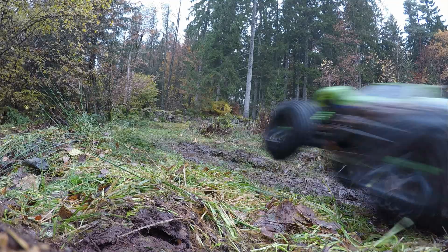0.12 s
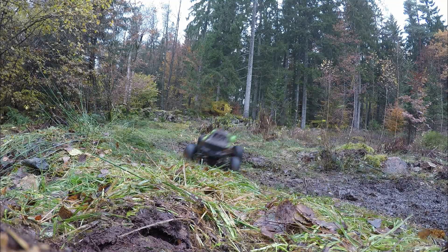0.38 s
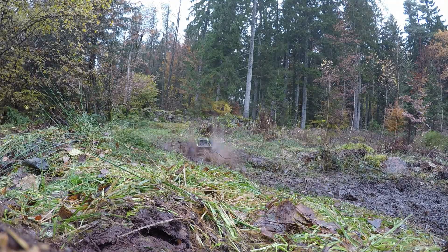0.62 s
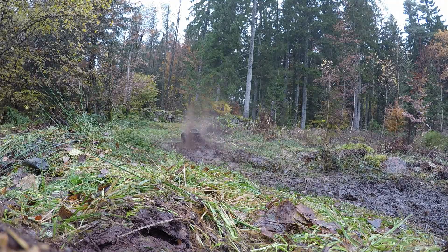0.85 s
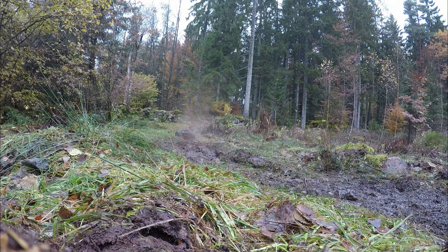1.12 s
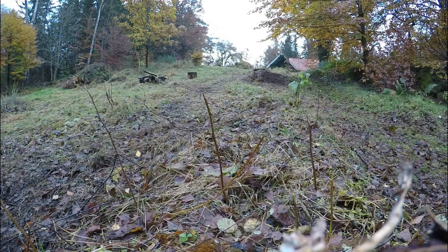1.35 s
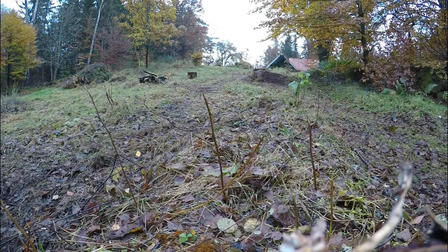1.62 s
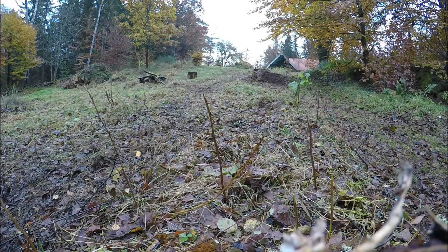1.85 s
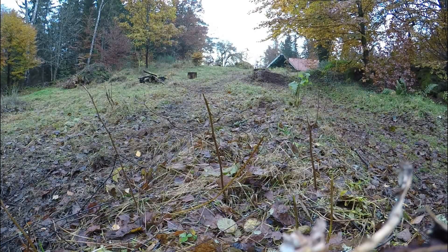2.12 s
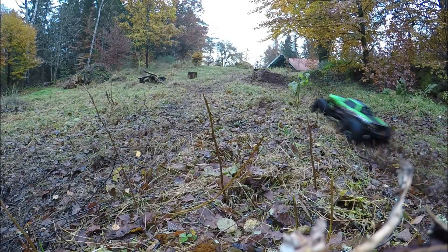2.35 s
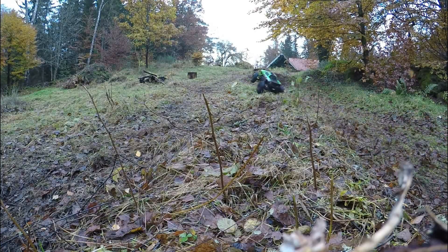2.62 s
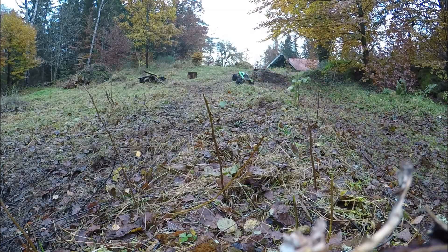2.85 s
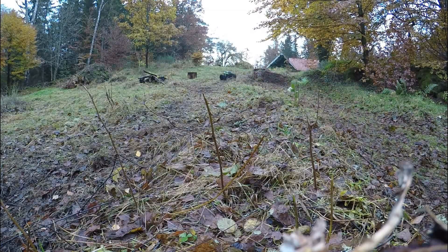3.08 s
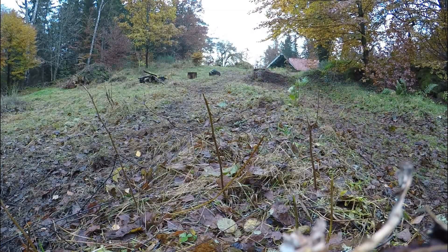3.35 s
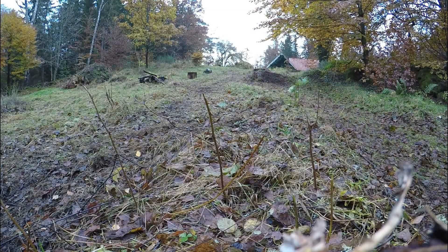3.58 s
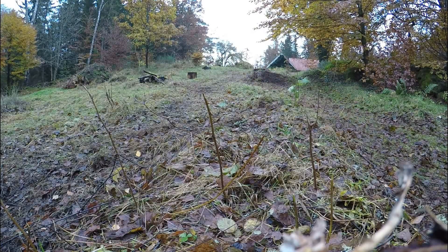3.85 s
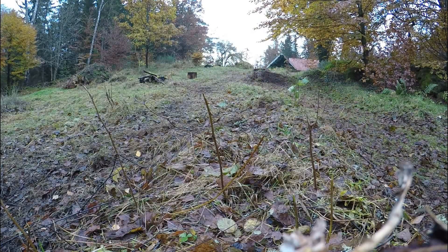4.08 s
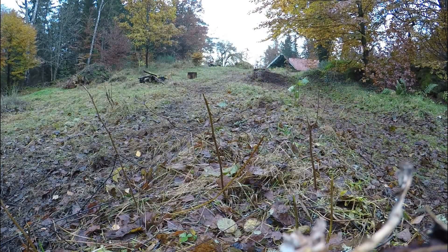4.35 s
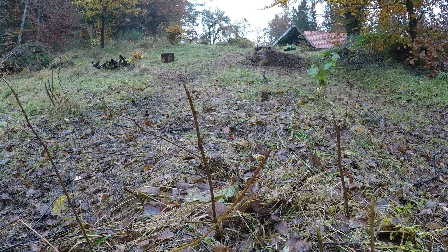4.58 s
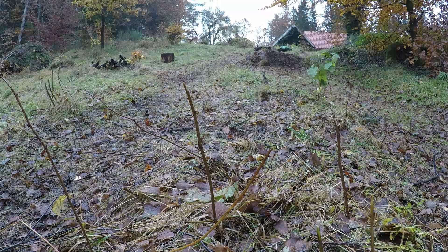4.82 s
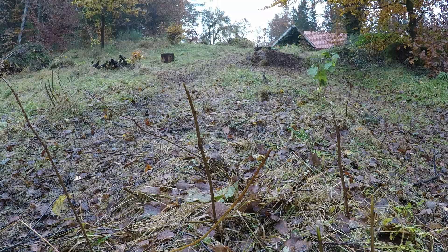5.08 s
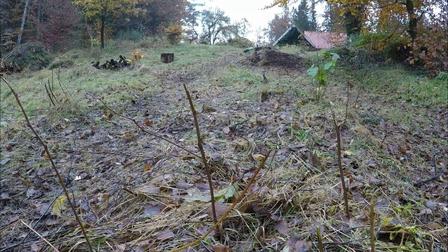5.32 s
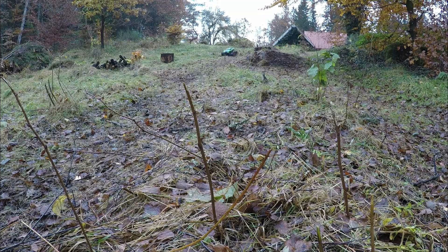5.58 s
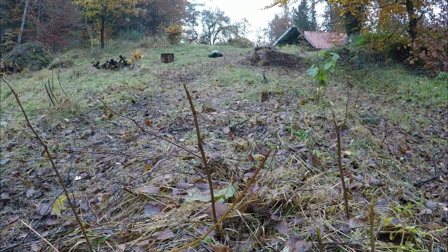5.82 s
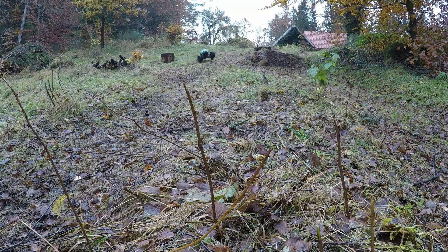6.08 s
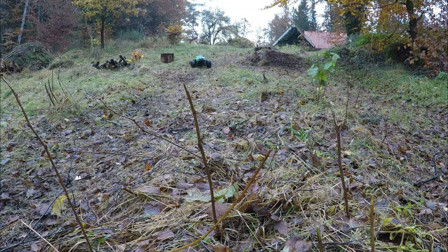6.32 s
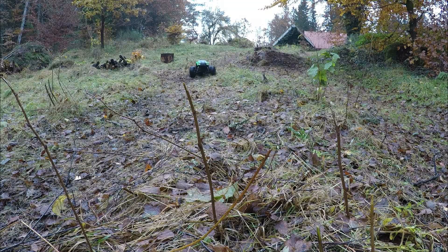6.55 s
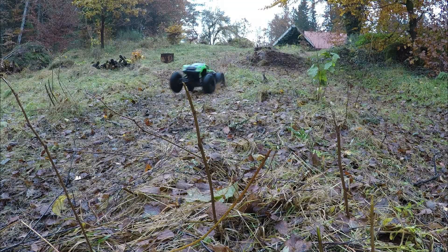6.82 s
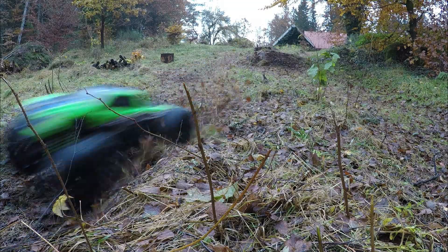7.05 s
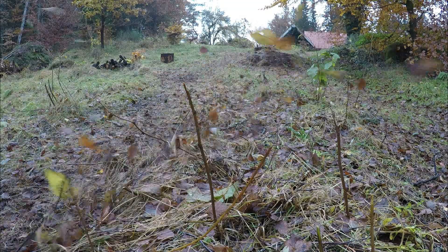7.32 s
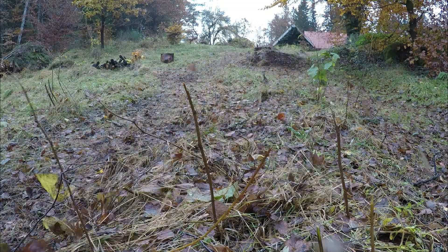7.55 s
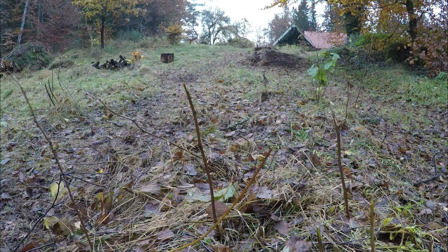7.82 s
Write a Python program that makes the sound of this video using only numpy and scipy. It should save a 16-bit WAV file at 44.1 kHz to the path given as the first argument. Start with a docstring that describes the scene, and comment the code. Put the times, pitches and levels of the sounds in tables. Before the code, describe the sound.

A fast electric model truck whines and tears past over wet leafy ground in four abruptly cut passages, gears screaming, tyres rumbling, mud spraying.

```python
"""A fast electric model truck whines and tears past over wet, leafy ground, in four passages end to end.
Gear and shaft lines are sines that follow the throttle, the mesh roughened by random modulation.
Tyre rumble, thrown mud, gearbox whirr and gear hiss are shaped noises; thuds and ticks are damped sines.
A two-port microphone on a camera colours the truck by its bearing; dirt lands nearby, light wind puffs
on the microphone and a faint hush surrounds it all."""
import sys
import numpy as np
from scipy import signal
from scipy.fft import rfft, irfft
from scipy.io import wavfile
from scipy.ndimage import uniform_filter1d

SR = 44100
rng = np.random.default_rng(int(sys.argv[2]) if len(sys.argv) > 2 else 0)


def decibels_to_gain(level_db):
    """Convert a level in decibels to a linear amplitude gain (20 dB per decade)."""
    exponent = np.asarray(level_db, float) / 20
    return 10 ** exponent


def materialize(psi):
    """Save the field psi as 16-bit PCM at rate SR to the path in sys.argv[1].

    A 1-D psi becomes a single channel; in a 2-D psi each row is a channel.
    """
    bounded = np.clip(np.atleast_2d(psi).T, -1, 1)
    quanta = np.round(bounded * 32767).astype(np.int16)
    wavfile.write(sys.argv[1], SR, quanta)


N = 349713

# Noise of the moving truck, one table a passage.
# Each row: time in seconds, gear hiss level in dB, tyre rumble level in dB.
DRIVE = [
    [(0, -25, -17.5), (.05, -21, -14), (.22, -19.5, -33.5), (.41, -26.5, -28.5), (.43, -24, -21),
     (.6, -18.5, -13), (.84, -27.5, -23), (1.11, -27, -20.5), (1.3, -36, -27.5), (1.35, -32.5, -30)],
    [(1.355, -41, -41), (1.5, -37, -42), (2.07, -23.5, -20.5), (2.43, -24.5, -19), (2.56, -30, -34.5),
     (2.73, -33.5, -27.5), (3.08, -35.5, -28.5), (3.16, -30.5, -35), (3.3, -40, -37), (3.39, -40, -40.5),
     (3.42, -46, -42), (3.58, -49, -35.5), (3.72, -46.5, -49.5), (4.21, -57, -49), (4.3, -60.5, -59),
     (4.7, -60, -56)],
    [(4.7, -57.5, -58), (5.0, -50, -48), (5.19, -56, -49), (5.35, -50.5, -48.5), (5.74, -50, -49.5),
     (6.02, -37.5, -38), (6.11, -41.5, -42.5), (6.36, -36, -35.5), (7.07, -23.5, -19.5), (7.23, -30, -22.5),
     (7.25, -41.5, -21), (7.4, -46.5, -45), (7.76, -53, -53.5)],
    [(7.77, -40.5, -28.5), (7.8, -41, -26), (7.815, -40, -34), (7.93, -47.5, -44)],
]
# Bearing cue of the truck. Each row: time in seconds, left over right in dB.
SIDE_DB = [(0, -4.5), (.22, -2), (.42, 4.5), (.84, 2), (1.34, 3.5), (1.36, -1), (2.07, -5.5), (2.43, -2),
           (2.6, 1.5), (3.05, 2.5), (4.7, 3), (5.0, 2.5), (6.0, 9.5), (7.07, 8.5), (7.24, 18), (7.4, 16),
           (7.75, -1.5), (7.78, 11), (7.93, 9)]


def evened(x):
    """Normalises mean power: scales to rms 1."""
    return x / np.sqrt(np.mean(np.abs(x) ** 2) + 1e-20)


def read(points, hz):
    """Interpolates a spectrum on a logarithmic frequency axis."""
    f, value = np.transpose(points)
    return np.interp(np.log(hz + 1), np.log(f + 1), value)


def columns(*tables):
    """Joins consecutive tables into envelopes: each column interpolated at every sample."""
    s, *values = np.concatenate(tables).T
    return [np.interp(np.arange(N) / SR, s, v) for v in values]


def add(mix, s, sound):
    """Superposes a sound on the mix, starting at s seconds."""
    part = mix[..., round(s * SR):][..., :sound.shape[-1]]
    part += sound[..., :part.shape[-1]]


def slow(hz, size):
    """Low-passed Gaussian noise: a random wander of rms 1, mostly below hz."""
    spectrum = rfft(rng.standard_normal(size))
    spectrum /= 1 + (np.fft.rfftfreq(size, 1 / SR) / hz) ** 4
    return evened(irfft(spectrum, size))


def noise(colour, patchy_db, jolt_db, jolt_hz, size=1024):
    """Random-phase synthesis: two unrelated noises sharing colour, drifting patches and wide-band jolts."""
    hz = np.fft.rfftfreq(size, 1 / SR)
    frames = 4 * N // size + 5
    *parts, patches = rng.standard_normal((frames, len(hz), 5)).T
    patches = uniform_filter1d(patches, size=9, axis=0)
    patches = evened(uniform_filter1d(patches, size=9, axis=1))
    spectra = np.array(parts[:2]) + 1j * np.array(parts[2:])
    spectra = spectra * decibels_to_gain(read(colour, hz)[:, None] + patchy_db * patches)
    pair = signal.istft(spectra, nperseg=size, noverlap=3 * size // 4)[1][:, :N]
    return evened(pair * decibels_to_gain(jolt_db * slow(jolt_hz, N)))


def ring(hz, t60, rise_s):
    """Damped oscillator: a sine of peak about 1 with a soft onset, falling 60 dB in t60 seconds."""
    t = np.arange(round(t60 * SR)) / SR
    shape = (1 - np.exp(-t / rise_s)) * decibels_to_gain(-60 * t / t60)
    return shape / shape.max() * np.sin(2 * np.pi * hz * t)


def motor(rows, overtone_db, breakup_db, hiss_db):
    """Order-locked tones: shaft and mesh lines keep fixed ratios, and the mesh throbs once a wheel turn."""
    # Shaft lines swell and fade about their speed rule. Each row: time in seconds, change in dB.
    free = [(.2, 1.5), (.28, 8), (.41, 8.5), (.46, 0.5), (1.8, 13.5), (2.0, -2), (2.5, -4), (2.6, 7),
            (3.36, 3), (3.45, 10), (3.53, 19), (3.62, 17), (4.5, -59), (4.9, 19.5), (5.6, 12.5), (5.9, 6.5),
            (6.8, 2.5), (6.9, 8.5), (7.12, 6.5), (7.2, -4)]
    # Lines above the shaft's own. Each row: multiple of shaft speed, level in dB.
    shaft_orders = [(1.43, -8.5), (1.89, 4)]
    # Gear-mesh lines. Each row: multiple of mesh frequency, level in dB.
    mesh_orders = [(1, 0), (2.05, -7), (2.72, -1)]
    # The gear case lets upper mesh orders out. Each row: frequency in Hz, gain in dB.
    case = [(3700, -25), (4200, -8), (5800, 0), (7700, 0), (8500, -25)]
    # Upper mesh orders against the first. Each row: time in seconds, extra level in dB.
    upper = [(.05, 5), (1.45, -1), (1.76, 6), (1.83, -5), (2.21, 13), (2.3, 2), (6.15, -5), (6.4, -6),
             (6.5, 3), (6.6, 7), (6.64, -5), (7.2, -12)]
    # Slower gears behind the first mesh. Each row: multiple of mesh frequency, level in dB.
    axle_orders = [(.655, 2), (.44, 2.5)]
    # The axle gears sing now and then. Each row: time in seconds, level over the gear hiss in dB.
    axle = [(.08, -30), (.15, -6), (.3, -5), (.36, -30), (2.45, -30), (2.55, -7), (3.03, -16), (3.07, -3),
            (3.11, -30), (7.3, -30), (7.36, -10), (7.45, -3), (7.47, -30)]
    mesh_per_turn, wheel_gearing = 6.48, 11  # mesh cycles per shaft turn, shaft turns per wheel turn
    full_speed_hz = 4180  # mesh frequency at which the shaft rule gives its base level

    s, *values = np.transpose(rows)
    t = np.arange(s[0], s[-1], 1 / SR)
    size = len(t)
    hz, mesh_db = (np.interp(t, s, v) for v in values)
    level_db = hiss_db[round(s[0] * SR):][:size]
    turn = 2 * np.pi * np.cumsum(hz * (1 + 0.008 * slow(30.8, size))) / SR / mesh_per_turn

    # The shaft grows 12.5 dB per octave of speed; its upper orders take the swell twice.
    free_db = np.interp(t, *np.transpose(free))
    shaft_db = level_db + free_db - 6.5 + 12.5 * np.log2(hz / full_speed_hz)
    shaft = [(0.99, 0.0037)] + [(k, db + overtone_db + free_db) for k, db in shaft_orders]
    out = np.zeros(size)
    for k, db in shaft:
        flutter_db = 3.0 * slow(25.0, size)
        out += decibels_to_gain(shaft_db + db + flutter_db) * np.sin(k * turn)

    rough = np.interp(hz, [1500, 2600, 3800], [.25, .55, .8])  # random share of mesh power
    rough = np.maximum(rough, breakup_db / 5)  # a stuttering mesh is also rough
    throb = 1 + .45 * np.cos(turn / wheel_gearing + .8 * slow(8., size))
    throb *= decibels_to_gain(breakup_db * slow(25., size))
    for k, db in mesh_orders:
        uneven = (slow(k * 80., size) + 1j * slow(k * 80., size)) / np.sqrt(2)
        teeth = np.sqrt(1 - rough) + np.sqrt(rough) * uneven
        case_db = read(case, k * hz) + np.interp(t, *np.transpose(upper)) if k > 1 else 0
        line = (teeth * np.exp(1j * k * mesh_per_turn * turn)).real
        out += decibels_to_gain(level_db + mesh_db + db + case_db) * throb * line

    axle_db = level_db + np.interp(t, *np.transpose(axle))
    for k, db in axle_orders:
        out += decibels_to_gain(axle_db + db) * slow(140., size) * np.sin(k * mesh_per_turn * turn)
    return s[0], np.sqrt(2) * out * signal.windows.tukey(size, .02)


def chatter(s, db, hz):
    """Repeated impulse response: three uneven ringing ticks."""
    out = np.zeros(round(.05 * SR))
    for k, (late, tune, size) in enumerate(rng.uniform(-1, 1, (3, 3))):
        tick = decibels_to_gain(db + 2.5 * size) * ring(hz * (1 + 0.042 * tune), 0.015, 0.00028)
        add(out, 0.0035 * k * (1 + 0.3 * late), tick)  # ticks about 3.5 ms apart
    return s, out


def tyres(rumble_db):
    """Broadband contact noise: low tyre rumble under the brighter spray of thrown mud."""
    # Spectra of tyre rumble and mud spray. Each row: frequency in Hz, relative density in dB per Hz.
    rumble = [(110, -0.5), (220, 3.5), (400, 1), (600, -7.5), (900, -21), (1500, -57)]
    spray = [(350, -6), (650, 8), (1000, 7), (1400, -1.5), (2200, -9.5), (2900, -29), (5000, -56)]
    # How much mud the tyres throw. Each row: time in seconds, spray over rumble in dB.
    mud = [(0, 3.5), (.05, -5.5), (.22, 11), (.41, 6), (.43, 1), (1.11, -4.5), (1.3, -9), (1.36, -2.5),
           (2.56, -3.5), (2.9, -20), (3.3, -13), (4.0, -27), (4.7, -6.5), (6.0, -18), (6.36, -15),
           (7.0, -6), (7.4, 1), (7.75, -2), (7.78, -14.5), (7.93, 3.5)]
    spray_db = rumble_db + columns(mud)[0]
    pair = decibels_to_gain(rumble_db) * noise(rumble, patchy_db=1.7, jolt_db=1.82, jolt_hz=19.0)
    return pair + decibels_to_gain(spray_db) * noise(spray, patchy_db=3.56, jolt_db=1.0, jolt_hz=31.0)


def shell_ring():
    """Modal resonance: noise rings narrow shell modes, each swelling on its own."""
    # Modes of the gearbox shell. Each row: frequency in Hz, width in Hz, level in dB.
    shell_modes = [(1716, 120, -1), (2400, 92, -1), (3130, 70, 1), (3860, 40, 2), (5560, 40, 4),
                   (5930, 63, 0)]
    drive = rng.standard_normal((2, N))
    out = np.zeros((2, N))
    for hz, width, db in shell_modes:
        mode = evened(signal.lfilter(*signal.iirpeak(hz, hz / width, SR), drive))
        out += decibels_to_gain(db + 3 * slow(6., N)) * mode
    return evened(out)


def gearbox(hiss_db):
    """Directional radiation: shell whirr crossfades with bearing, over resonant ringing and gear hiss."""
    # Shell spectra heard end-on, then side-on. Each row: frequency in Hz, relative density in dB per Hz.
    whirr = [
        [(850, -19), (1450, -10), (1620, -3.5), (1780, 0), (2290, -2), (3120, 0.5), (3460, 2), (3880, 1),
         (4400, -10.5), (5720, -8.5), (9680, -120)],
        [(900, -16.5), (1500, -8.5), (2100, -9.5), (2700, -12), (3600, -10.5), (5000, -51), (9000, -92)],
    ]
    # Gear hiss spectrum. Each row: frequency in Hz, relative density in dB per Hz.
    hiss = [(2530, -49), (4300, -8.5), (5070, -7.5), (5700, -3.5), (6720, -4.5), (7330, -7.5),
            (8170, -13.5), (9930, -18), (12000, -39.5), (13700, -36), (14700, -67)]
    # Each row: time in seconds, gearbox whirr over gear hiss in dB.
    shell = [(0, -9.5), (.22, 1.5), (.6, -6.5), (.84, -3.5), (1.11, -8), (1.4, -3.5), (2.4, -4.5),
             (2.56, 1.5), (3.16, -3), (3.3, 10), (3.39, 4), (3.72, -3), (4.2, 7), (4.7, -2), (6.0, -3.5),
             (6.11, 5), (6.36, -6.5), (7.07, 1), (7.25, 1), (7.4, -1), (7.75, -5), (7.93, 5)]
    # Each row: time in seconds, shell resonances over the whirr in dB.
    ringing = [(1.9, -10), (2.2, -18), (2.8, -9.5), (5.9, -9.5), (6.45, 3), (6.9, -8)]
    whirr_db = hiss_db + columns(shell)[0]
    side_on = bearing(columns(SIDE_DB)[0])
    pair = decibels_to_gain(whirr_db + columns(ringing)[0]) * shell_ring()
    for colour, share in zip(whirr, (1 - side_on, side_on)):
        pair += decibels_to_gain(whirr_db) * np.sqrt(share) * noise(colour, patchy_db=2.0, jolt_db=0.64, jolt_hz=47.0)
    return pair + decibels_to_gain(hiss_db) * noise(hiss, patchy_db=1.87, jolt_db=0.99, jolt_hz=5.3, size=512)


def thuds():
    """Impact response: the chassis lands on bumps and clods thump down close by, as damped sines."""
    # Chassis landing on bumps. Each row: start in seconds, peak level in dB, frequency in Hz.
    bumps = [(0.012, -8, 215), (0.125, -16.5, 228), (0.443, -9.5, 262), (0.691, -10, 376),
             (1.105, -28, 290), (2.325, -13, 245.3), (2.397, -14.5, 283), (2.709, -20.5, 341),
             (3.095, -21, 305), (6.767, -21, 428), (7.155, -12.5, 199.5), (7.2, -8.5, 186)]
    # Clods thumping down. Each row: start in seconds, peak level in dB, frequency in Hz.
    clods = [(7.345, -15.5, 218), (7.564, -23.5, 174), (7.769, -21, 229), (7.786, -25, 326),
             (7.827, -18.5, 240)]
    out = np.zeros(N)
    for hits, t60_s in (bumps, 0.1), (clods, 0.013):
        for s, db, hz in hits:
            add(out, s, decibels_to_gain(db) * ring(hz, t60_s, rise_s=0.0058))
    return out


def truck():
    """Superposition: direct sound, and an unrelated twin of its noise that stands for scattered sound."""
    # Throttle runs, one table each.
    # Each row: time in seconds, gear mesh frequency in Hz, mesh line over the gear hiss in dB.
    runs = [
        [(0, 2150, 4), (.08, 2413, -11), (.13, 2881, -6), (.19, 3046, -17), (.33, 3230, -9), (.37, 3196, -2.5),
         (.45, 3092, -39), (.98, 2960, -6.5)],
        [(1.352, 1485, 5.5), (1.54, 1748, -2.5), (1.6, 1878, -34), (1.66, 1900, -2.5), (1.88, 3000, -3.5),
         (1.93, 3157, -11), (2.0, 3680, -6), (2.05, 3735, -7), (2.14, 3400, -14), (2.29, 3950, -15),
         (2.385, 3620, -9), (2.45, 3106, -15), (2.53, 3690, -18), (2.64, 4130, -6), (2.75, 3765, -9),
         (2.8, 3930, -21), (2.85, 3625, -4), (3.0, 3928, -16), (3.07, 3565, 0.5), (3.13, 3090, -7),
         (3.2, 3776, -5.5), (3.34, 4024, 2), (3.47, 3495, -30), (3.53, 2835, -30), (3.62, 2150, -25)],
        [(3.8, 3360, -7), (4.05, 3290, -9), (4.3, 3340, 0), (4.5, 3570, -18), (4.6, 3440, 0), (4.8, 3260, -6)],
        [(4.82, 1500, -5), (4.91, 1530, 0), (5.02, 1740, -3), (5.15, 1520, -4), (5.29, 1590, -2),
         (5.4, 1770, -4), (5.53, 1706, -5), (5.68, 1848, -11), (5.78, 1624, -0.5), (5.94, 1987, 0.5),
         (5.99, 2140, -7), (6.03, 2474, -3), (6.15, 3006, 3), (6.28, 2930, -8), (6.325, 2450, -4),
         (6.37, 2500, -22), (6.44, 2700, -5), (6.605, 2960, -3), (6.63, 3380, 6.5), (6.67, 3740, -2),
         (6.72, 3555, -3), (6.9, 4115, -10), (7.06, 3920, -3), (7.1, 3543, -4), (7.13, 3270, -28)],
        [(7.17, 2300, -15), (7.195, 2400, 2), (7.225, 2150, 2), (7.26, 2020, 5), (7.31, 1550, 1),
         (7.35, 1900, -11), (7.4, 2130, -7), (7.45, 2620, -4), (7.47, 2700, -20)],
        [(7.45, 967, -10), (7.5, 1106, -6), (7.535, 1250, -6), (7.6, 1540, -16)],
    ]
    # One value a run: strength of the upper shaft orders in dB.
    overtones_db = [-8, -41.5, -12, -33, -19, -17]
    # One value a run: how much the mesh stutters in dB.
    breakups_db = [3.5, 1.5, 2.5, 1.8, 2.2, 3]
    # A gear chatters under load; the last row is a dry tick of flung dirt. Each row: start in seconds, nominal
    # peak in dB, nominal frequency in Hz.
    chatters = [(4.07, -36, 3100), (4.165, -42, 3300), (4.198, -38.5, 3500), (5.9255, -27, 5830),
                (5.968, -19, 5830), (5.984, -23, 5830), (5.998, -25, 5830), (6.008, -20.5, 5830),
                (7.157, -14, 6000)]
    hiss_db, rumble_db = columns(*DRIVE)
    pair = tyres(rumble_db) + gearbox(hiss_db)
    direct = pair[0]
    for rows, overtone_db, breakup_db in zip(runs, overtones_db, breakups_db):
        add(direct, *motor(rows, overtone_db, breakup_db, hiss_db))
    direct += thuds()
    for row in chatters:
        add(direct, *chatter(*row))
    return pair


def bearing(pan_db):
    """Level-difference localisation: 0 ahead (2.5 dB to the left), 1 far right (4 dB to the right)."""
    ahead_db, right_db = 2.5, -4.0
    return np.clip((pan_db - ahead_db) / (right_db - ahead_db), 0, 1)


def ports(pair):
    """Diffraction: the camera body gives each port its own level and phase, by the truck's bearing."""
    # The two microphone ports. Each row: frequency in Hz, left over right in dB and left lead in radians
    # for a source ahead, the same two for one far right, likeness of the ports from 0 to 1.
    responses = [(167, 0.5, 0.6, 2, 1.3, 1), (305, 7, -0.15, 5.5, -1.5, 1), (454, 4, 1.4, 11.5, 0.2, 0.71),
                 (595, 12, -2.5, 8, -1.5, 0.95), (765, 2, -1.65, -4.5, -2, 1),
                 (1200, -4.5, -1, -11, -3, 0.92), (1770, 1, 1.15, -14.5, -2.5, 0.83),
                 (3000, -1.5, -0.37, -10.5, -1.5, 1), (5130, 3.5, 0.74, 0.5, -3, 0.85),
                 (6030, 3, -0.4, -5.5, -4, 0.67), (8400, -3.5, 1.32, -11, -4, 0.91),
                 (11400, 0, 0.67, -12.5, -5.5, 1)]
    frame, hop = 512, 128  # samples
    hz, t, (direct, other) = signal.stft(pair, SR, nperseg=frame, noverlap=frame - hop)
    pan_db = np.interp(t, np.arange(N) / SR, columns(SIDE_DB)[0])
    right = bearing(pan_db)
    f, *values = np.transpose(responses)
    tilt_ahead, lead_ahead, tilt_right, lead_right, same = (np.interp(hz, f, v)[:, None] for v in values)
    tilt_db = tilt_ahead + (tilt_right - tilt_ahead) * right
    lead = lead_ahead + (lead_right - lead_ahead) * right
    # Passing on the left, beyond 7.5 dB, shadows the far port, fully from 1470 Hz up.
    tilt_db += np.outer(np.clip(hz / 1470.0, 0, 1), np.maximum(pan_db - 7.5, 0))
    same = np.clip(same, 0, 1)
    near = np.sqrt((1 + same) / 2) * direct
    far = np.sqrt((1 - same) / 2) * other
    spectra = []
    for side in (1, -1):  # left, right
        spectra.append((near + side * far) * decibels_to_gain(side * tilt_db / 2) * np.exp(side * .5j * lead))
    return signal.istft(spectra, SR, nperseg=frame, noverlap=frame - hop)[1][:, :N]


def dirt():
    """Impulsive impact: flung dirt lands as dry ticks, each a heavily damped sine of a few cycles."""
    # Each row: start in seconds, peak level in dB, centre frequency in Hz, left over right in dB.
    landings = [(7.3461, -8.5, 2860, 6), (7.374, -23, 4500, 2), (7.5911, -15.5, 4770, 8.5),
                (7.669, -25, 5540, 6), (7.305, -19, 1870, 19), (7.7853, -16, 1640, 5)]
    out = np.zeros((2, N))
    for s, db, hz, pan_db in landings:
        gain = decibels_to_gain(db + np.array([[pan_db / 2], [-pan_db / 2]]))
        add(out, s, gain * ring(hz, 4.5 / hz, rise_s=0.000087))
    return out


def wind():
    """Turbulent pressure: lumpy low-frequency noise, nearly alike at both ports."""
    # Wind strength, one table a passage. Each row: time in seconds, level in dB.
    gusts = [
        [(.1, -42), (0.7, -36.5), (1.35, -38.5)],
        [(1.36, -68), (1.54, -78), (2.17, -60), (2.48, -42), (3.11, -41.5), (3.9, -55.5), (4.7, -75)],
        [(4.7, -79), (6.6, -80), (7.03, -58), (7.2, -30.5), (7.45, -35.5), (7.77, -35.5)],
        [(7.77, -37), (7.93, -26.5)],
    ]
    # Wind spectrum. Each row: frequency in Hz, relative density in dB per Hz.
    colour = [(8.8, -37), (15, -9), (38, -4), (70, -7.5), (120, -13), (210, -120)]
    pair = noise(colour, patchy_db=2., jolt_db=3., jolt_hz=6., size=4096)
    both, apart = decibels_to_gain(columns(*gusts)[0]) * pair
    return np.array([both + 0.31 * apart, both - 0.23 * apart])


def woods():
    """Diffuse field: unrelated sum and difference noises make a faint, wide hush from all around."""
    # Spectra of the ports' sum, then difference. Each row: frequency in Hz, relative density in dB per Hz.
    hush = [
        [(71, -32), (120, 7), (1080, -16.5), (1440, -9.5), (3430, -20), (4160, -21), (12000, -27.5),
         (15600, -50)],
        [(71, -38), (120, 1.5), (793, -6), (907, -3.5), (2940, -22), (3560, -21), (12000, -29), (15600, -66)],
    ]
    # Levels of the sum, then the difference, in dB.
    hush_db = [-53.5, -50]
    mid = decibels_to_gain(hush_db[0]) * noise(hush[0], patchy_db=4.0, jolt_db=0.59, jolt_hz=9.9)[0]
    side = decibels_to_gain(hush_db[1]) * noise(hush[1], patchy_db=1.3, jolt_db=.6, jolt_hz=8.)[0]
    return np.array([mid + side, mid - side])


def scene():
    """High-pass filtering: a steep low cut acts on airborne sound; wind pressure gets through below it."""
    low_cut = signal.butter(10, 135.3, "highpass", fs=SR, output="sos")  # corner in Hz
    airborne = ports(truck()) + dirt() + woods()
    return signal.sosfilt(low_cut, airborne) + wind()


def top_cut(x):
    """Nothing passes above the cut-off."""
    return signal.sosfilt(signal.butter(12, 14820, fs=SR, output="sos"), x)


def record(dry):
    """Signal chain: the finished mix passes to its last stage."""
    return top_cut(dry)


dry = scene()
out = record(dry)
materialize(out)
```